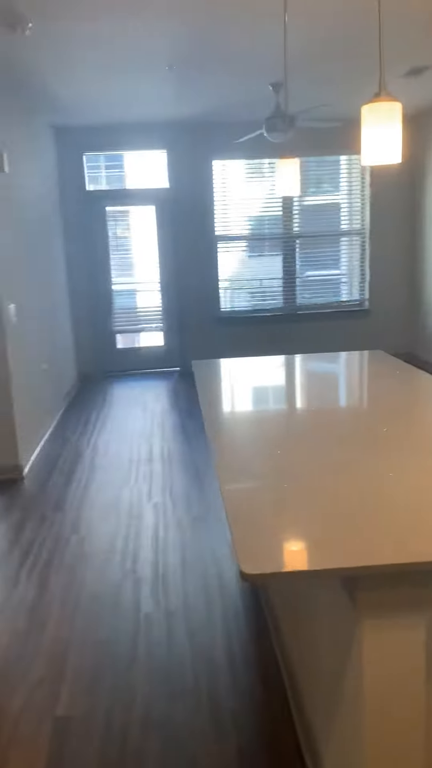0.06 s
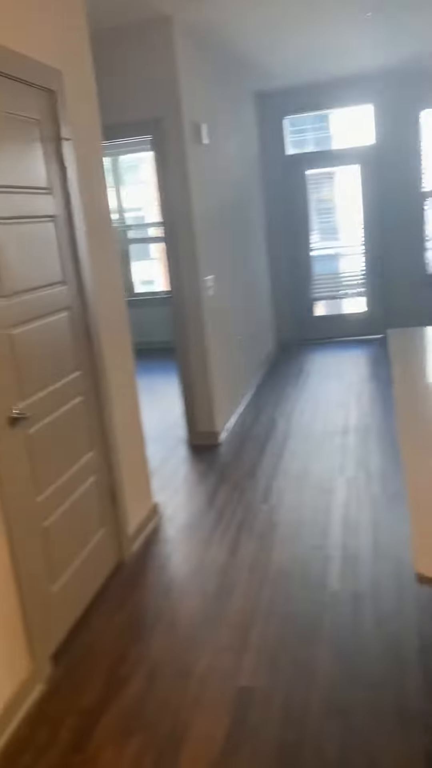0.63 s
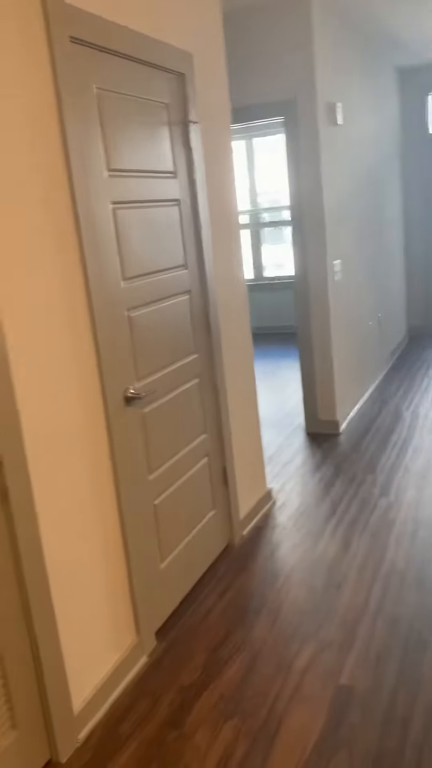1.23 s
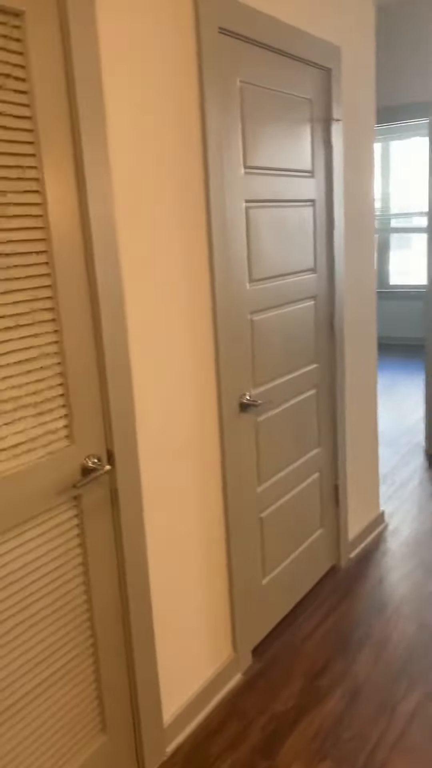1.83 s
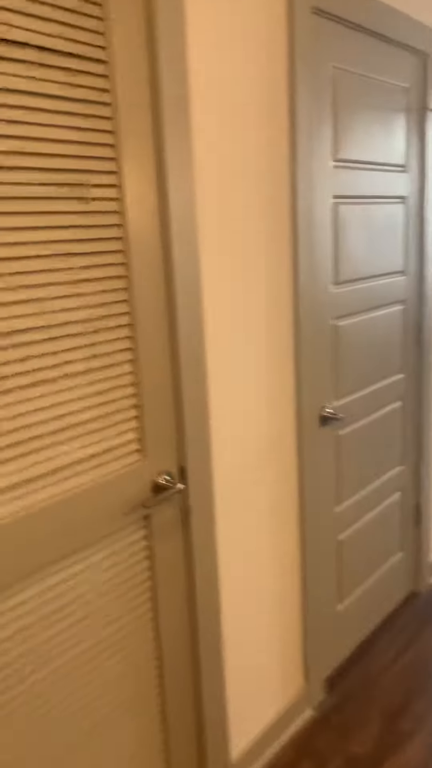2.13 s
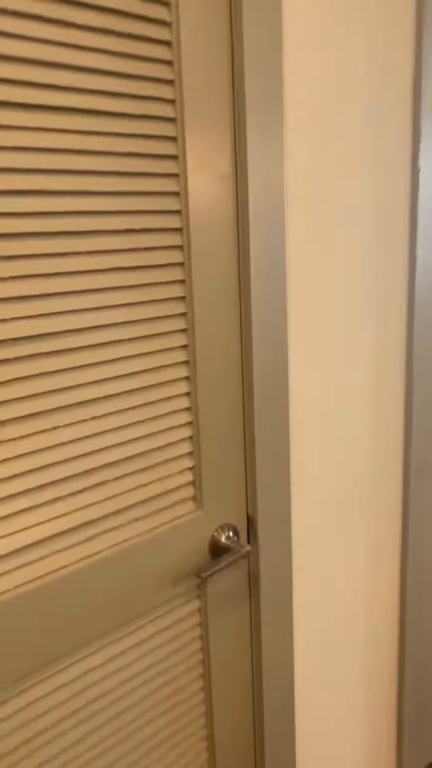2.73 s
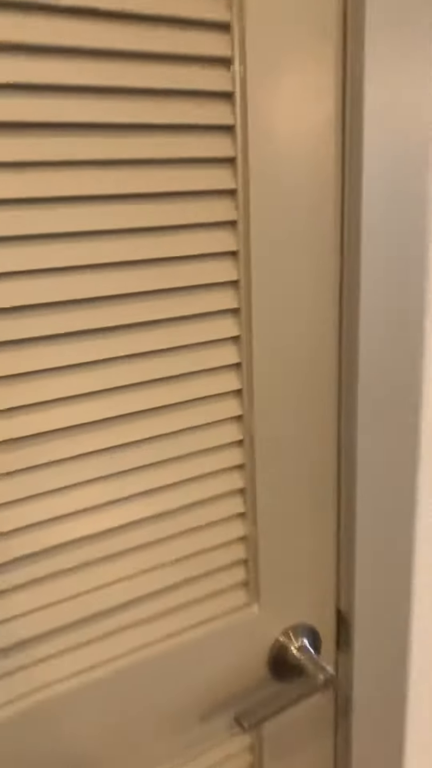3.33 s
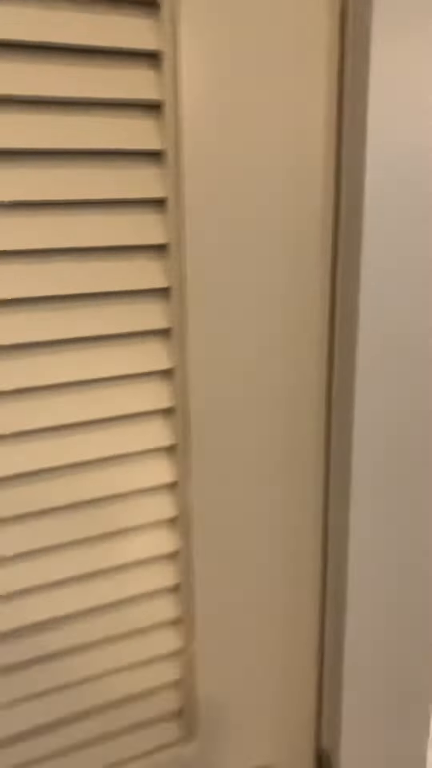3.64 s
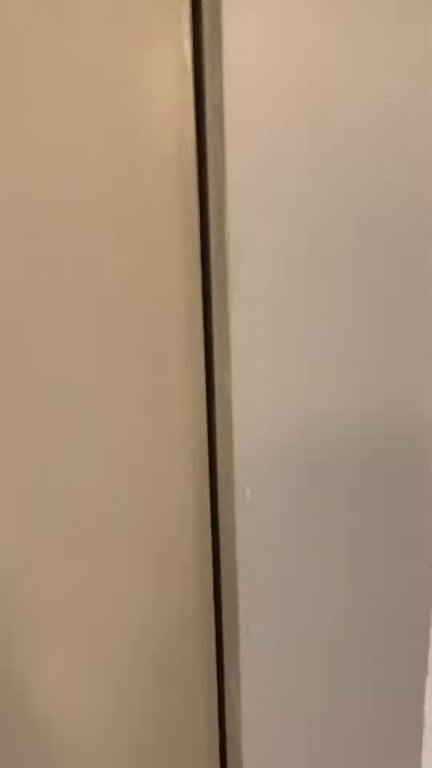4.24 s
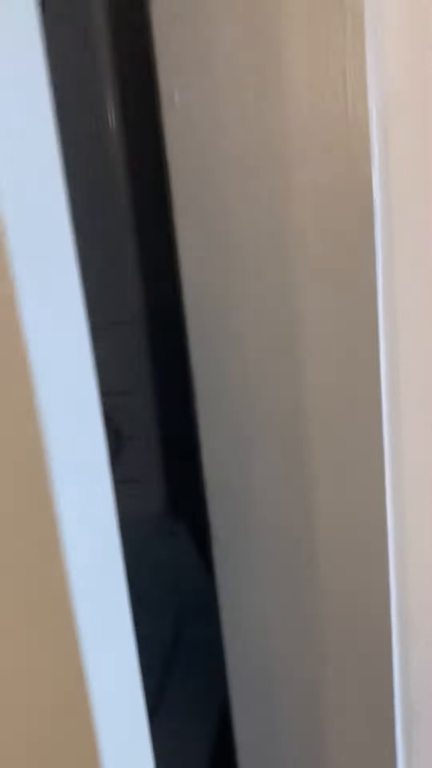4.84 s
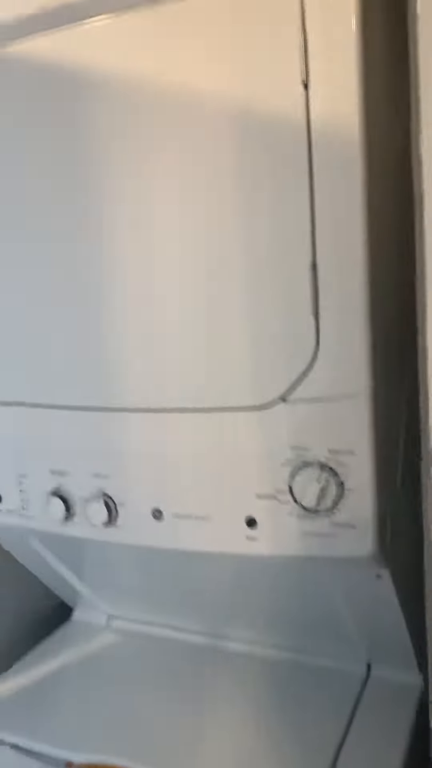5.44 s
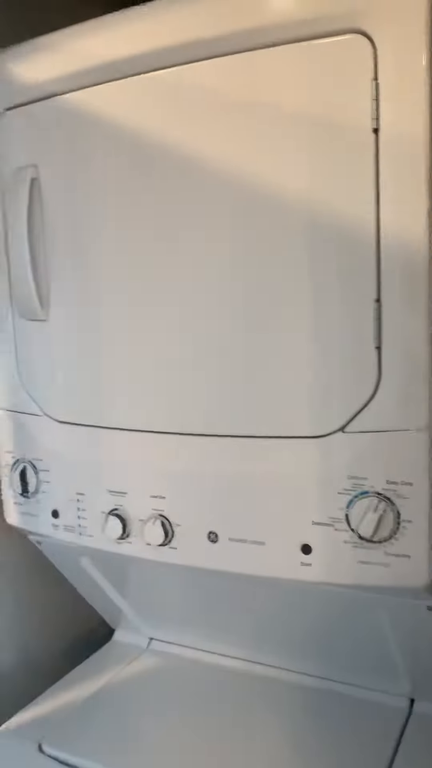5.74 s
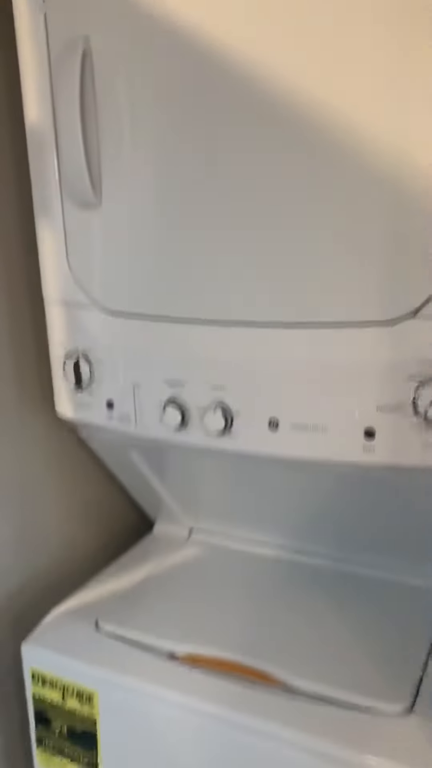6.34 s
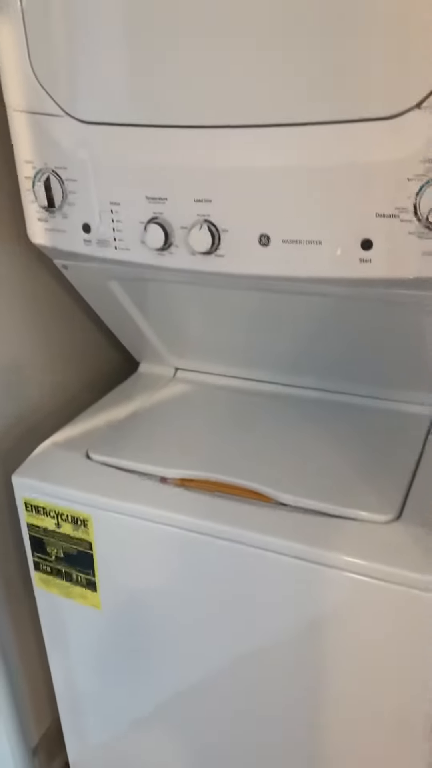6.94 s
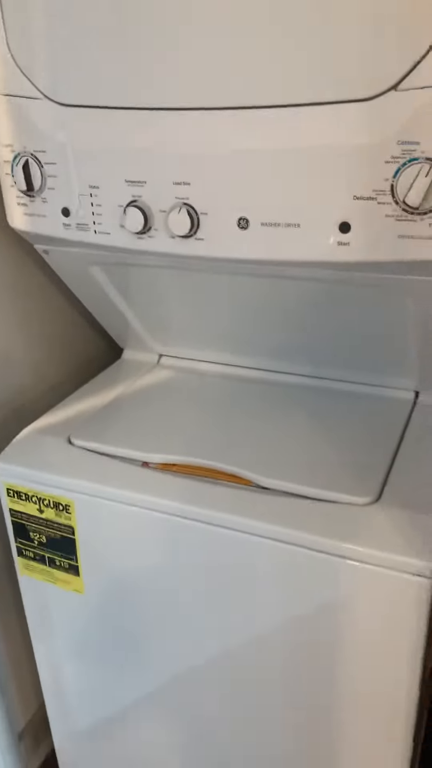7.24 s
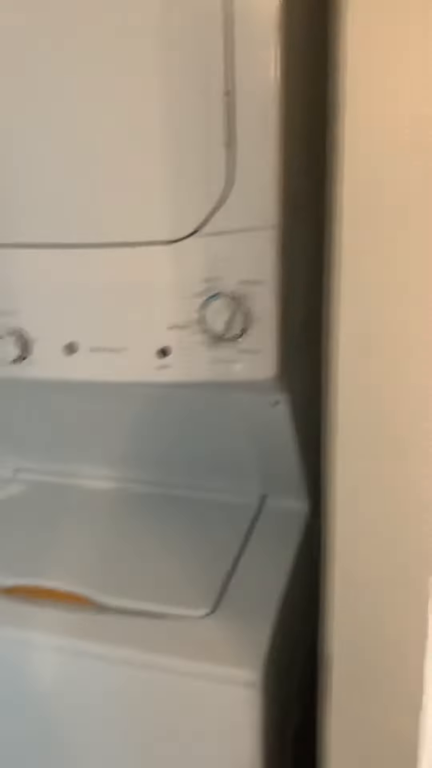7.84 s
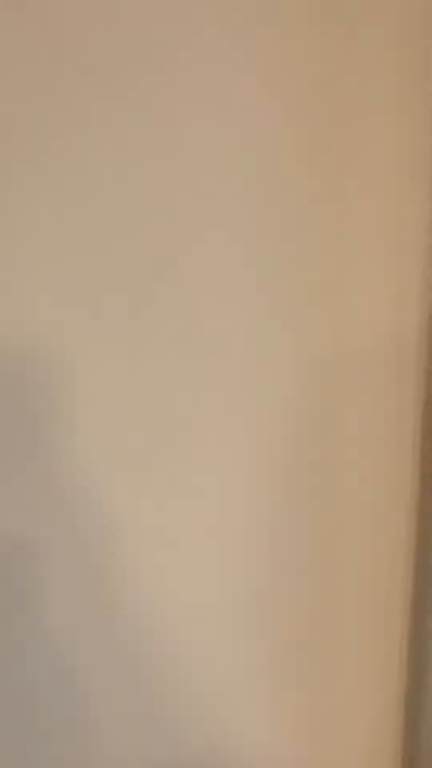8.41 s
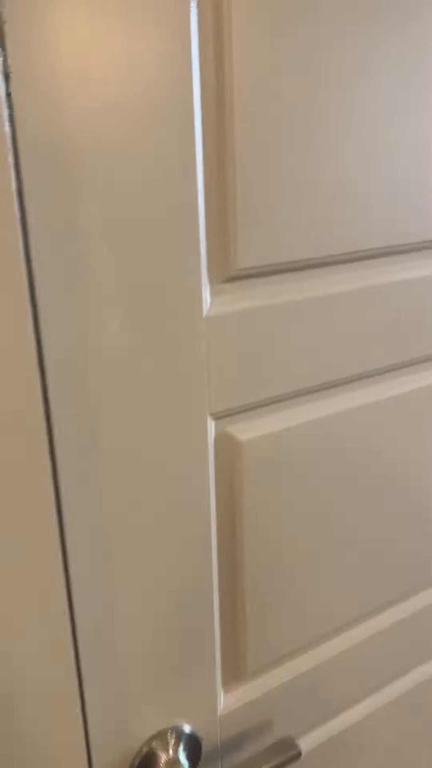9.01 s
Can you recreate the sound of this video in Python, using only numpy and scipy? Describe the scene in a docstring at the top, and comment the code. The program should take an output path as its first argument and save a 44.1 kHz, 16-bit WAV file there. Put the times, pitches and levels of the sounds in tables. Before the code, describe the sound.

Over a faint murmur of moving air, a wooden door some way off scrapes, clicks and knocks, and the hard floor thuds. After a couple of soft footfalls, a nearby lever handle clicks and a louvred closet door drags and bangs loose with a short buzz. A lighter rub and clatter comes later, and finally a muffled knock from another room. Everything echoes off bare walls.

```python
"""Closet doors in an empty apartment.

A door down the hall rubs and clatters. Close by, a lever handle clicks and a louvred (slatted) door
judders free of its frame. Each knock rings a wooden panel; each rub is a stream of tiny slips.
Knocks and footfalls come from other rooms and the hard floor thuds. It all echoes off bare walls,
over the murmur of ventilation."""
import sys
import numpy as np
from scipy import signal
from scipy.fft import rfft, irfft, next_fast_len
from scipy.io import wavfile

SR = 44100
rng = np.random.default_rng(int(sys.argv[2]) if len(sys.argv) > 2 else 0)


def dump(signal):
    """Clip the signal to [-1, 1] and save it as 16-bit WAV at the path in sys.argv[1]."""
    limited = np.clip(np.atleast_2d(signal).T, -1, 1)
    pcm = np.round(limited * 32767).astype(np.int16)
    wavfile.write(sys.argv[1], SR, pcm)


N = 404397
AGE = np.arange(SR // 2) / SR   # seconds since a contact

# The louvred door bumps its frame. Each row: start in seconds, panel level in dB, panel pitch in Hz,
# clack level in dB, clack pitch in Hz, crack level in dB, echo level in dB.
LOUVRED_KNOCKS = [(3.68, -56, 290, -53.5, 1120, -55, 2), (3.899, -39.5, 290, -42.5, 1250, -41, 0),
                  (4.183, -32, 240.2, -33, 958, -39, -4), (4.472, -27, 310, -35, 999, -32, -2),
                  (4.514, -22.5, 200, -31.5, 950, -32, 0.5), (4.583, -22, 340, -37, 1551, -41, -2),
                  (4.611, -13.5, 450, -16.5, 1400, -27.5, -2), (4.619, -13, 330, -33, 1150, -45.5, -4.5)]
# The louvred door's modes, the tones it rings at when hit. Each row: pitch in Hz, level in dB.
LOUVRED_MODES = [(128, -5), (173, 2.5), (232, 1), (289, -5.5), (343, 2.5), (390, -0.5), (442, 4.5),
                 (490, -3.5), (583, -0.5), (684, -9), (971, -7.5), (1220, -8.5)]
# The modes of a solid door, also used for the dull thumps. Each row: pitch in Hz, level in dB.
SOLID_MODES = [(135, -6.5), (170, -10), (252, -5), (285, -1), (335, -1), (380, 0.5), (432, 1), (480, -3),
               (560, -7), (790, 2)]
# The crack of a solid door's hard edge. Each row: frequency in Hz, level in dB.
SOLID_EDGE = [(800, -14), (2200, 1), (5000, -4.5), (7300, -8.5), (10000, -37.5), (16000, -34.5)]


def louvred_door():
    """The nearby slatted door bumps against its frame as it works free."""
    # The crack of its edge. Each row: frequency in Hz, level in dB.
    edge = [(800, -26), (2000, 5), (3200, 1), (5000, -7), (7500, -7.5), (10000, -14), (16000, -16)]
    return knocks(LOUVRED_KNOCKS, LOUVRED_MODES, edge, cycles=13, clack_t60=.028, crack_t60=.03,
                  rise_s=.00091, focus_db=4.5, overtone_db=-4.5, spot_db=11.5)


def panel_hum(blows, hum_db=-3, width_hz=13):
    """The louvred door goes on humming at its modes after each blow."""
    hum = sum(signal.lfilter(*signal.iirpeak(hz, hz / width_hz, fs=SR), blows)
              for hz, _ in LOUVRED_MODES)
    return blows + from_db(hum_db) * hum


def knocks(rows, modes, edge, cycles, clack_t60, crack_t60, rise_s, focus_db, overtone_db, spot_db):
    """Wood hits wood: the panel booms and rattles, its side bars clack, and the hard edge cracks."""
    # The panel's loose joints and its side bars. Each row: frequency in Hz, level in dB.
    joint_spectrum = [(40, -21), (130, -3.5), (300, -3), (560, -2.5), (800, -12), (1800, -26),
                      (4000, -66.5)]
    bar_spectrum = [(250, -28.5), (600, -5.5), (1000, -6), (1600, -7), (2300, -11.5), (3300, -15.5),
                    (6000, -48)]
    skid_s = .012   # the edge skids just before it knocks
    onset = swell(rise_s)
    paths = np.zeros((2, 2, N))
    for s, panel_db, panel_hz, clack_db, clack_hz, crack_db, room_db in rows:
        # where the blow lands decides which modes answer
        spot = lambda hz: spot_db * bell(hz, panel_hz, .7)
        boom = ring(modes, spot(np.array(modes)[:, 0]), cycles, scatter_db=1.5)
        rattle = unit(noise(joint_spectrum, boost=spot) * fade(.064))
        panel = unit((boom + from_db(-2) * rattle) * onset)
        # a bar's second tone is nearly three times as high as its first
        bar = lambda hz: focus_db * bell(hz, clack_hz, .17) + overtone_db * bell(hz, 2.9 * clack_hz, .35)
        clack = unit(noise(bar_spectrum, boost=bar) * fade(clack_t60) * onset)
        crack = unit(noise(edge) * fade(crack_t60) * onset)
        blow = from_db(panel_db) * panel + from_db(clack_db) * clack + from_db(crack_db) * crack
        add(paths, s, blow, room_db)
        add(paths, s - skid_s, from_db(crack_db - 6) * skid(edge, skid_s), room_db)
    return paths


def latches(ring_db=-12, snap_db=-9, rise_s=.00054, skid_s=.004, room_db=-4):
    """Bolts and levers skid, snap against their stops and ring briefly."""
    # Each row: start in seconds, level in dB, extra treble around 13 kHz in dB.
    clicks = [(1.511, -23.5, -5.5), (1.568, -26, -1), (1.645, -34.5, -5), (1.666, -30, -6.5),
              (3.681, -48.5, 1), (3.774, -55, -5.5), (3.9, -44.5, 5.5), (4.033, -35.5, -6.5),
              (4.037, -15.5, -5), (4.053, -25.5, -9), (4.067, -21, 3.5), (4.183, -34.5, -1.5),
              (4.376, -31.5, 2.5), (4.430, -30.5, 5.5), (5.623, -61, 9), (6.156, -44, 6),
              (6.192, -45.5, 16)]
    # The noisy snap and the tones of the metal. Each row: frequency in Hz, level in dB.
    snap_spectrum = [(1300, -6), (4000, 0.5), (7000, -5), (10000, -6.5), (16000, -10)]
    metal_modes = [(3480, -1.5), (5700, 4), (6800, 0.5), (7700, 1), (11080, -5.5), (15300, -9)]
    paths = np.zeros((2, 2, N))
    for s, db, treble_db in clicks:
        hiss = noise(snap_spectrum, boost=lambda hz: treble_db * bell(hz, 13000, .45))
        snap = unit(hiss * fade(.027) * swell(rise_s))
        metal = ring(metal_modes, weight_db=0, cycles=40, scatter_db=4)
        add(paths, s, from_db(db) * (from_db(snap_db) * snap + from_db(ring_db) * metal), room_db)
        add(paths, s - skid_s, from_db(db - 22) * skid(snap_spectrum, skid_s), room_db)
    return paths


def rubbing(room_db=-2):
    """A door edge drags along its frame: the panel groans and the paint scrapes."""
    # Each row: end of a push in seconds, its length in seconds, groan level in dB, scrape level in dB.
    strokes = [(1.02, 0.18, -69.5, -65), (1.37, .15, -51, -62.5), (1.744, 0.37, -36, -38),
               (4.04, .14, -47, -55.5), (4.624, 0.21, -27.5, -43), (6.237, 0.099, -43, -54)]
    # The groan and the scrape. Each row: frequency in Hz, level in dB.
    groan_spectrum = [(30, -23), (110, -8.5), (230, -1.5), (400, 1.5), (750, -16), (1600, -4),
                      (2600, -14.5), (6000, -22), (16000, -41)]
    scrape_spectrum = [(300, -32), (1000, -1), (1700, 1.5), (2600, -7), (6000, -4.5), (10000, -20),
                       (16000, -27)]
    pressure = np.array([push(end_s, length_s) for end_s, length_s, _, _ in strokes])
    _, _, groan_db, scrape_db = np.transpose(strokes)
    groan = from_db(groan_db) @ pressure * slips(groan_spectrum, per_s=400, t60=.085)
    # the scrape grows with pressure faster than the groan
    scrape = from_db(scrape_db) @ pressure ** 1.6 * slips(scrape_spectrum, per_s=900, t60=.017)
    rub = groan + scrape
    return np.array([rub, rub * from_db(room_db)])


def push(end_s, length_s, grip_s=.061, build_db=11.5, release_db_per_s=198.5):
    """Pressure on a door takes hold, builds until the door gives, then lets go."""
    t = np.arange(N) / SR - end_s
    grip = np.clip((t + length_s) / grip_s, 0, 1)
    return grip * from_db(np.minimum(build_db * t / length_s, -release_db_per_s * t))


def slips(spectrum, per_s, t60):
    """Many tiny slips come at random moments, each dying away quickly."""
    clicks = (rng.random(N) < per_s / SR) * rng.standard_normal(N)
    rub = signal.oaconvolve(clicks[None], noise(spectrum) * fade(t60), axes=1)[:, :N]
    return rub / rub.std()


def skid(spectrum, length_s):
    """Two parts slide over each other, getting louder until they strike."""
    count = round(length_s * SR)
    return noise(spectrum)[:, :count] * np.linspace(0, np.sqrt(3), count)


def chatter(waver=.067, overtone_db=-13, room_db=-4):
    """A dragging edge sticks and slips, making a short buzz of wavering pitch."""
    # Each row: start in seconds, length in seconds, level in dB, pitch in Hz.
    buzzes = [(1.577, .036, -28, 438.6), (3.961, .07, -43, 135), (4.539, .075, -20, 127),
              (6.205, .11, -46, 281.2)]
    paths = np.zeros((2, 2, N))
    for s, length_s, db, hz in buzzes:
        wobble = np.interp(AGE, np.linspace(0, AGE[-1], 50), rng.standard_normal(50))
        phase = 2 * np.pi * np.cumsum(hz * (1 + waver * wobble)) / SR
        grip = np.sqrt(np.abs(np.sin(np.pi * np.minimum(AGE / length_s, 1))))
        buzz = np.sin(phase) + from_db(overtone_db) * np.sin(2 * phase)
        add(paths, s, from_db(db) * grip * buzz, room_db)
    return paths


def solid_doors():
    """Four other doors knock, each with its own clack, edge, hardness and amount of echo."""
    # Each door: echo level in dB, boost of the clack's pitch in dB, edge treble in dB, rise in seconds.
    # A long or negative rise makes a knock start softly.
    hall = (-2.5, 14, 0, .002)
    near = (-4.5, 10.5, -1, 0.5)
    back = (1.5, 17, -7, -0.1)
    side = (4, 16, -0.5, -0.2)
    # Each row: start in seconds, door name, panel level in dB, panel pitch in Hz,
    # clack level in dB, clack pitch in Hz, crack level in dB.
    blows = [(1.033, "side", -60, 444, -47, 1346, -44.5), (1.372, "hall", -44, 294, -58.5, 1547, -70.5),
             (1.451, "hall", -46, 290, -51, 1300, -58), (1.508, "hall", -39, 300, -35.5, 1300, -31.5),
             (1.565, "hall", -41, 350, -37, 1160, -31), (1.644, "hall", -36, 330, -34.5, 1430, -33),
             (1.650, "hall", -35, 360, -41, 1605, -49), (1.661, "hall", -55, 384, -32, 1640, -34),
             (1.726, "hall", -41.5, 395, -42, 1743, -38.5), (5.623, "near", -56, 221, -53.5, 1270, -57.5),
             (6.150, "near", -72, 221, -45, 953, -40), (6.192, "near", -58.5, 250, -45, 1120, -44),
             (6.222, "near", -44, 270, -40, 1680, -43), (8.451, "back", -48.5, 410, -46.5, 892, -52),
             (8.529, "back", -54, 387, -54, 930, -57)]
    doors = {"hall": hall, "near": near, "back": back, "side": side}
    paths = np.zeros((2, 2, N))
    for door, (room_db, focus_db, treble_db, rise_s) in doors.items():
        rows = [(s, *blow, room_db) for s, name, *blow in blows if name == door]
        edge = [(hz, db + treble_db * bell(hz, 7000, .5)) for hz, db in SOLID_EDGE]
        paths += knocks(rows, SOLID_MODES, edge, cycles=20, clack_t60=.055, crack_t60=.066,
                        rise_s=rise_s, focus_db=focus_db, overtone_db=11, spot_db=13.5)
    return paths


def floor_thuds(t60=.072, rise_s=.01, floor_hz=71.4, lag_s=.0048):
    """Soft, heavy bumps swing the floor for a few slow cycles; so does each louvred door knock."""
    # The soft bumps. Each row: start in seconds, level in dB, pitch in Hz.
    bumps = [(1.743, -29, 71), (1.779, -31.5, 53.4), (1.901, -39, 48.5), (2.041, -48, 52), (4.235, -39, 75),
             (4.477, -31.5, 66), (4.70, -29, 54), (5.856, -45.5, 50.3), (5.934, -48, 50.5),
             (6.335, -44, 57.4)]
    door_bumps = [(s + lag_s, db - 15, floor_hz) for s, db, *_ in LOUVRED_KNOCKS]
    paths = np.zeros((2, 2, N))
    for s, db, hz in bumps + door_bumps:
        swing = np.sin(2 * np.pi * hz * AGE) * fade(t60) * swell(rise_s)
        add(paths, s, from_db(db) * unit(swing), room_db=-5)
    return paths


def dull_thumps():
    """Dull thumps without a crack: footfalls and, last, the low boom of the back door's knock."""
    # Each row: start in seconds, thump level in dB, thump pitch in Hz, clack level in dB,
    # clack pitch in Hz, echo level in dB, rise in seconds.
    thumps = [(0.280, -52, 225, -56.5, 1750, 0, .002), (2.651, -45.5, 400, -51.5, 1340, 7.5, 0.029),
              (3.403, -46, 175, -62, 796, -2.5, .007), (8.480, -49.5, 129.3, -65, 900, -1.5, 0.013)]
    no_crack = -np.inf
    paths = np.zeros((2, 2, N))
    for *thump, room_db, rise_s in thumps:
        paths += knocks([(*thump, no_crack, room_db)], SOLID_MODES, SOLID_EDGE, cycles=10,
                        clack_t60=.045, crack_t60=1, rise_s=rise_s,
                        focus_db=7, overtone_db=-7, spot_db=15.5)
    return paths


def scuffs(t60=.13):
    """A sole brushes the floor: a soft rasp that swells and fades."""
    # Each row: start in seconds, level in dB.
    brushes = [(0.035, -66.5), (3.425, -63)]
    # The rasp. Each row: frequency in Hz, level in dB.
    sole_spectrum = [(400, -14.5), (1200, 0.5), (3200, -4), (12000, -37)]
    paths = np.zeros((2, 2, N))
    for s, db in brushes:
        rasp = unit(noise(sole_spectrum) * fade(t60) * swell(t60) ** 2)
        add(paths, s, from_db(db) * rasp, room_db=0)
    return paths


def room_echo(sent, early_db, tail_db, fill_s, early_t60=.12, early_rise_s=.0028):
    """Sound bounces off the hall walls, then fills the rooms with a long tail whose treble dies first."""
    # Each row: frequency in Hz, seconds to fade by 60 dB, level in dB.
    bands = [(40, 0.97, 1), (120, 1, 1.5), (250, 1, -0.5), (433, 1.25, 0), (640, 1.3, 2), (930, 1.6, 3.5),
             (1570, 1.4, -1), (2780, 1.35, 1), (5370, 0.94, -2), (10500, 0.6, -3), (16000, 0.32, -2)]
    age = np.arange(2 * SR) / SR
    hz = np.fft.rfftfreq(len(age), 1 / SR)
    centres, t60s, levels = np.transpose(bands)
    colour = np.column_stack([centres, levels])
    wash = rfft(noise(colour, len(age)))
    decay = lambda t60: fade(t60, age) / np.linalg.norm(fade(t60, age))   # same energy at any length
    tail = 0
    for share, t60 in zip(np.eye(len(bands)), t60s):
        band = irfft(wash * at_hz(np.column_stack([centres, share]), hz))
        tail = tail + band * decay(t60)
    early = noise(colour, len(age)) * decay(early_t60) * swell(early_rise_s, age)
    echo = from_db(tail_db) * tail * swell(fill_s, age) + from_db(early_db) * early
    return signal.fftconvolve(sent[:1], echo, axes=1)[:, :N]


def ventilation(level_db=-60.5):
    """Moving air murmurs steadily."""
    # Each row: frequency in Hz, level in dB.
    air_spectrum = [(25, -24), (59, -2), (120, -10.5), (229, -7), (363, -16), (700, -14.5), (1150, -15.5),
                    (1700, -21), (2550, -26.5), (3520, -34.5), (7000, -41), (10500, -42.5), (16000, -48)]
    return from_db(level_db) * noise(air_spectrum, next_fast_len(N, True))[:, :N]


def building_rumble():
    """The building gives a faint, deep rumble that rises, dips and finally drops away."""
    # Each row: time in seconds, level in dB.
    levels = [(0, -61), (2.4, -58), (2.8, -66.5), (6.4, -58), (6.9, -100)]
    # Each row: frequency in Hz, level in dB.
    rumble_spectrum = [(20, -15), (58, 7.5), (100, -6.5), (400, -60.5)]
    gain = from_db(np.interp(np.arange(N) / SR, *np.transpose(levels)))
    return gain * noise(rumble_spectrum, next_fast_len(N, True))[:, :N]


def ring(modes, weight_db, cycles, scatter_db):
    """A struck object's tones each fade over some number of cycles, with new strengths at every blow."""
    hz, db = np.transpose(modes)
    gains = from_db(db + weight_db + scatter_db * rng.standard_normal(len(hz)))
    signs = (-1) ** np.arange(len(hz))
    tones = np.sin(2 * np.pi * hz[:, None] * AGE) * fade(cycles / hz[:, None])
    return unit((gains * signs) @ tones)


def noise(spectrum, count=len(AGE), boost=np.zeros_like):
    """Stereo noise of level 1, shaped by a spectrum; boost adds dB by frequency."""
    # How alike left and right are. Each row: frequency in Hz, likeness from 0 to 1.
    likeness = [(130, .99), (330, .93), (550, .82), (850, .68), (2300, .6), (3400, .68), (4600, .94)]
    hz = np.fft.rfftfreq(count, 1 / SR)
    alike = np.clip(at_hz(likeness, hz), 0, .995)
    mid, side = np.exp(2j * np.pi * rng.random((2, len(hz))))
    pair = np.sqrt(1 + alike) * mid + np.sqrt(1 - alike) * side * [[1], [-1]]
    shaped = irfft(pair * from_db(at_hz(spectrum, hz) + boost(hz)), count)
    return shaped / shaped.std()


def add(paths, s, sound, room_db):
    """Put a sound on two stereo paths: straight to the listener, and into the room to echo."""
    at = round(s * SR)
    part = sound[..., :N - at]
    paths[0, :, at:at + part.shape[-1]] += part
    paths[1, :, at:at + part.shape[-1]] += part * from_db(room_db)


def swell(rise_s, age=AGE):
    """Build up from silence."""
    return 1 - np.exp(-age / rise_s)


def fade(t60, age=AGE):
    """Die away by 60 dB every t60 seconds."""
    return np.exp(-np.log(1000) * age / t60)


def unit(blow):
    """Scale a blow so that its first 30 ms have an average (rms) level of 1."""
    return blow / np.sqrt(np.mean(blow[..., :int(.03 * SR)] ** 2))


def bell(hz, centre_hz, octaves):
    """A hump of height 1 around a frequency."""
    return np.exp(-.5 * (np.log2((hz + 1e-6) / centre_hz) / octaves) ** 2)


def at_hz(points, hz):
    """Read between a table's rows, with octaves evenly spaced."""
    centres, values = np.transpose(points)
    return np.interp(np.log(hz + 1e-6), np.log(centres), values)


def from_db(db):
    """Turn decibels into a gain."""
    return 10 ** (np.asarray(db) / 20)


def scene():
    """Doors, latches, thumps and floor sound with their echoes, over the ventilation and rumble."""
    door, door_sent = louvred_door()
    clicks, clicks_sent = latches()
    rest, rest_sent = solid_doors() + dull_thumps() + scuffs() + floor_thuds() + rubbing() + chatter()
    echoes = (room_echo(panel_hum(door_sent), early_db=-1.5, tail_db=0, fill_s=.039)
              + room_echo(clicks_sent, early_db=-5.5, tail_db=-1.24, fill_s=.0067)
              + room_echo(rest_sent, early_db=-4, tail_db=-.5, fill_s=.0073))
    return door + clicks + rest + echoes + ventilation() + building_rumble()


def record(dry):
    """Two spaced microphones hear slightly out of step; peaks are rounded and the top treble is cut."""
    # Each row: frequency in Hz, how far the left channel leads in radians.
    left_lead = [(0, 0), (300, .08), (600, .65), (1700, 1.0), (2200, 3.0), (2900, 2.8), (3500, 1.7),
                 (4650, 3.14), (8900, 9.42), (16000, 19.9)]
    ceiling, cutoff_hz = .95, 15900
    size = next_fast_len(N + SR // 10, True)
    lead = np.interp(np.fft.rfftfreq(size, 1 / SR), *np.transpose(left_lead))
    shifted = irfft(rfft(dry, size) * np.exp(.5j * lead * [[1], [-1]]), size)[:, :N]
    rounded = shifted / (1 + (shifted / ceiling) ** 6) ** (1 / 6)
    return signal.sosfilt(signal.ellip(12, .1, 80, cutoff_hz, fs=SR, output="sos"), rounded)


dry = scene()
out = record(dry)
dump(out)
```